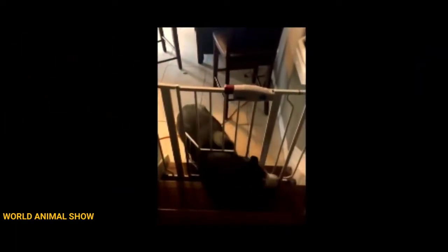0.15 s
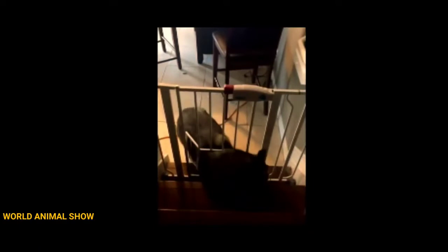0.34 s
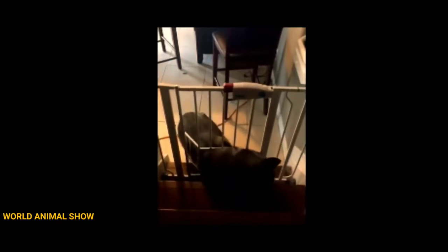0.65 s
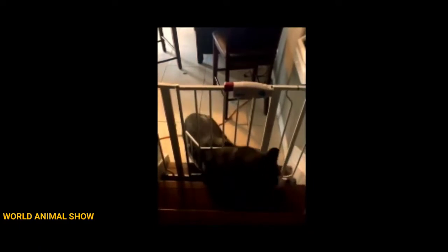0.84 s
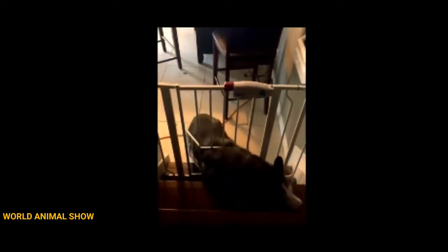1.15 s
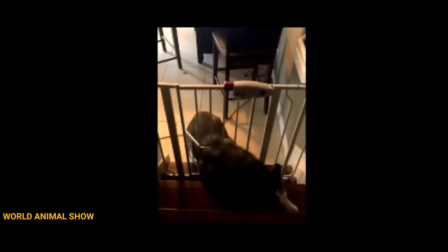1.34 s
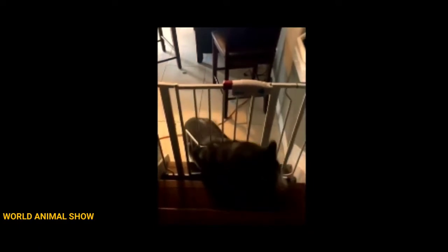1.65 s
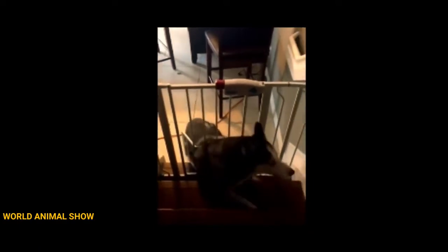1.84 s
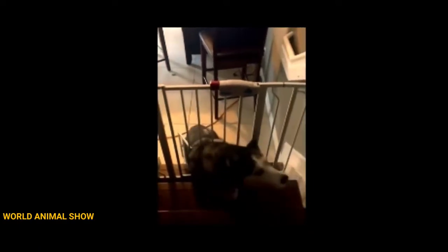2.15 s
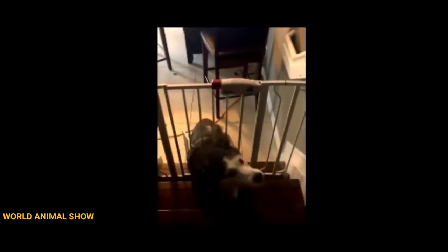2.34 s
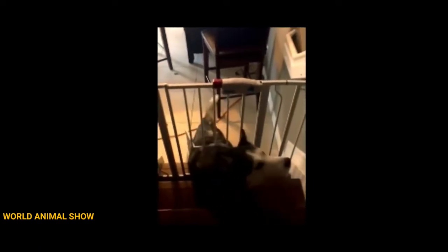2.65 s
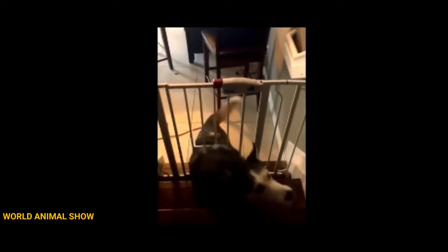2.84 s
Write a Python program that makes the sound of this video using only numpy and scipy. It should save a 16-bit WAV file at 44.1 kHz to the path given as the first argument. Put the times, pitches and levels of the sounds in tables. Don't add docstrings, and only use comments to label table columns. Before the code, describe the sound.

Irregular metallic clanks and dull wooden thumps as a dog squeezes past a barred indoor gate

```python
import sys
import numpy as np
from scipy import signal
from scipy.fft import rfft, irfft
from scipy.io import wavfile
from scipy.ndimage import uniform_filter1d

SR = 44100
rng = np.random.default_rng(int(sys.argv[2]) if len(sys.argv) > 2 else 0)


def waveform_to_disk(signal):
    frames = np.transpose(np.atleast_2d(signal))
    scaled = np.clip(frames, -1, 1) * 32767
    samples = np.round(scaled).astype(np.int16)
    wavfile.write(sys.argv[1], SR, samples)


def invert_db(x):
    u = np.asarray(x, float) / 20
    return 10 ** u


N = 132300
ATTACK_S = 0.001232

# (time [s], weight on the step [dB], fur and pads rubbing [dB])
EFFORT = [(0, -31, -48), (.045, -62, -58.5), (.15, -49.5, -45), (0.349, -51.5, -65), (0.601, -43, -45.5),
          (.9, -43.5, -49), (0.999, -28, -61), (1.22, -52, -43.5), (1.5, -50.5, -45.5), (1.75, -56.5, -37),
          (1.95, -45, -68), (2.05, -32.5, -77), (2.15, -41, -43), (2.52, -39.5, -37.5), (2.6, -33.5, -44),
          (2.74, -34, -69), (2.82, -46, -62), (3, -44.5, -61.5)]
# (pitch [Hz], level [dB], t60 [s])
STEP_MODES = [(64, -5.5, 0.11), (99.5, -1, 0.15), (153.9, -2.5, 0.29), (243.7, -4.5, 0.29),
              (298, -5.5, 0.31), (410, -6, 0.02), (499.3, 3, 0.17)]


def unit(x):
    return x / np.sqrt(np.mean(x ** 2))


def decay(t, t60):
    return np.exp(-np.log(1000) * t / t60)


def band(x, lo_hz, hi_hz):
    sos = signal.butter(2, [lo_hz, hi_hz], "band", fs=SR, output="sos")
    return signal.sosfilt(sos, x) * np.sqrt(SR / 2 / (hi_hz - lo_hz))


def highpass(x, hz, order):
    return signal.sosfilt(signal.butter(order, hz, "high", fs=SR, output="sos"), x)


def add(out, x, start_s):
    i = max(int(start_s * SR), 0)
    out[i:i + len(x)] += x[:N - i]


def ring(modes, scatter_db=0, detune=0.02):
    t = np.arange(SR // 3)[:, None] / SR
    hz, db, t60 = np.array(modes).T
    hz = hz * (1 + detune * rng.uniform(-1.04, 1, len(hz)))
    y = (invert_db(db + scatter_db) * np.sin(2 * np.pi * hz * t) * decay(t, t60)).sum(axis=1)
    return y / np.sqrt(np.sum(y ** 2))


def grit(size):
    return unit(rng.standard_normal(size) * invert_db(2.2 * rng.exponential(size=size)))


def patches(spread_db, size):
    return np.repeat(invert_db(spread_db * rng.standard_normal(size // 256 + 1)), 256)[:size]


def coloured(points, x):
    hz, db = np.array(points).T
    f = np.arange(N // 2 + 1) * SR / N + 1
    gain = invert_db(np.interp(np.log(f), np.log(hz), db)) * np.minimum(f / hz[0], 1) ** 2
    return unit(irfft(rfft(x) * gain, N))


def walk(rate_hz):
    k = int(SR / rate_hz)
    steps = np.repeat(rng.standard_normal(N // k + 1), k)
    return uniform_filter1d(uniform_filter1d(steps, k), k)[:N]


def contact(length_s):
    t = np.arange(SR // 4) / SR
    rise_s = ATTACK_S + 0.22 * length_s
    fall = np.exp(-t / max(length_s, 0.001)) + invert_db(-1.5) * np.exp(-t / rise_s)
    shape = np.minimum(t / rise_s, 1) ** 2 * fall
    bounces = np.where(t < 2 * rise_s, 1, patches(3, len(t)))
    x = grit(len(t)) * shape * bounces
    return x * np.sqrt(np.sum(shape ** 2) / np.sum(x ** 2))


def sing(table, loose):
    out, t = np.zeros(N), np.arange(SR // 4) / SR
    push = 1 - np.exp(-t / 0.0013)
    fade = np.cos(2 * np.pi * t)
    for start_s, db, hz, t60_s in table:
        buzz = 1 + loose * unit(uniform_filter1d(grit(len(t)), size=150))
        x = push * buzz * np.sin(2 * np.pi * hz * t) * decay(t, t60_s)
        add(out, invert_db(db) * x * fade, start_s - ATTACK_S)
    return out


def room_air():
    # (frequency [Hz], density [dB per Hz])
    air_spectrum = [(150, 4.5), (400, -38), (1500, -13), (6000, -18), (12000, -16), (16000, -39)]
    return invert_db(-60.5) * coloured(air_spectrum, rng.standard_normal(N))


def rubbing():
    # (frequency [Hz], density [dB per Hz])
    rub_spectrum = [(300, 8.5), (1000, -1), (2500, 3), (5000, -3), (11500, -18.5), (15500, -21)]
    time_s, _, rub_db = np.array(EFFORT).T
    shared = walk(25.64)
    edges_hz = 150 * 3.2 ** np.arange(5)
    grains = np.zeros(N)
    for lo, hi in zip(edges_hz[:-1], edges_hz[1:]):
        patchiness = invert_db(3.5 * (shared + walk(40.25)))
        grains += band(grit(N), lo, hi) * np.sqrt(hi - lo) * patchiness
    return coloured(rub_spectrum, grains) * invert_db(np.interp(np.arange(N) / SR, time_s, rub_db))


def creak():
    time_s, weight_db, _ = np.array(EFFORT).T
    push = rng.standard_normal(N) * invert_db(3 * walk(25.29))
    x = signal.fftconvolve(push, ring(STEP_MODES[:3]))[:N]
    return unit(x) * invert_db(np.interp(np.arange(N) / SR, time_s, weight_db))


def tags():
    # (time [s], level [dB], length [s], top mode boost [dB])
    thick_shakes = [
        (.0, -33.5, 0.0051, 14),
        (.133, -35, 0.0122, 7),
        (.413, -23, 0.014, -1),
        (1.875, -34, 0.068, 10),
        (1.951, -25, 0.012, 10.5),
    ]
    thin_shakes = [
        (.452, -36.5, 0.077, 14),
        (.575, -40.5, 0.078, 5),
        (.615, -36.5, 0.044, 8),
        (.645, -34, 0.033, -1),
        (.73, -37.5, 0.094, 24),
        (2.677, -48, 0.0023, 17),
        (2.712, -25.5, 0.0076, 7),
        (2.722, -39.5, 0.041, 0),
        (2.775, -53, 0.034, -2),
    ]
    # (pitch [Hz], level [dB], t60 [s])
    thick_modes = [(5300, 0, .014), (9450, -4, .011), (14050, -3, .007)]
    thin_modes = [(5530, -14, .015), (6750, -14, .015), (8390, 0, .024), (12000, 0, .013)]
    out, t = np.zeros(N), np.arange(SR // 6) / SR
    for shakes, modes in ((thin_shakes, thin_modes), (thick_shakes, thick_modes)):
        for start_s, db, length_s, top_db in shakes:
            shape = (t < length_s) * np.exp(-t / 0.074) * np.minimum(t / 0.00022, 1)
            x = grit(len(t)) * patches(3.5, len(t)) * shape
            x = x * np.sqrt(np.sum(shape ** 2) / np.sum(x ** 2))
            boost_db = top_db * (np.arange(len(modes)) == len(modes) - 1)
            add(out, invert_db(db) * signal.fftconvolve(x, ring(modes, boost_db, detune=0.005)), start_s)
    return out


def thumps():
    # (time [s], level [dB], pitch [Hz], clatter [dB])
    pushes = [(.004, -30, 250, -1.5), (0.118, -31.5, 245, 1.5), (.236, -8.5, 352, -10),
              (.266, -23.5, 413, -4.5), (.283, -39, 380, -7), (.327, -21.5, 281, -4),
              (.35, -25.5, 232, -15), (.385, -25.5, 635, 4), (0.543, -31, 150, -14), (0.584, -47, 178, -7),
              (.749, -14, 181, 1.5), (.893, -32, 220, -1), (0.916, -30, 214, 2), (.954, -21.5, 760, -6),
              (.967, -28.5, 106, 8), (0.984, -22, 199, -3), (1.012, -25.5, 155, -6),
              (1.242, -7, 257, -12.5), (1.292, -17, 290, -16), (1.566, -23.5, 278, -4.5),
              (1.572, -30.5, 100, -4), (1.71, -20, 370, -4), (1.977, -16.5, 335, -2.5),
              (2.056, -18.5, 226, 3.5), (2.081, -17, 155, -4.5), (2.149, -20, 149, -9),
              (2.217, -33.5, 145, 6), (2.349, -23, 420, -2), (2.393, -17.5, 149, 1.5),
              (2.5, -23, 218, -2.5), (2.555, -20.5, 132, -9), (2.649, -23.5, 158, 0), (2.611, -36, 92, -16),
              (2.83, -37, 149, -7), (2.877, -33, 146, -3.5)]
    lag_s = 0.00372
    out, t = np.zeros(N), np.arange(SR // 3) / SR
    for start_s, db, hz, loose_db in pushes:
        cycles = t * hz
        knock = np.sin(2 * np.pi * cycles) * np.minimum(cycles, 1) * decay(cycles, 4.69)
        knock = highpass(knock, hz / 2, order=2)
        scatter_db = 2 * rng.standard_normal(len(STEP_MODES))
        boards = signal.fftconvolve(knock, ring(STEP_MODES, scatter_db))
        clatter = band(contact(0.027), 260, 627)
        add(out, invert_db(db + 11) * knock, start_s + lag_s)
        add(out, invert_db(db - 13.5) * boards / np.abs(boards).max(), start_s + lag_s)
        add(out, invert_db(db - 10.5 + loose_db) * clatter, start_s)
    return out


def claws():
    # (time [s], body [dB], hiss [dB], length [s])
    strokes = [(0.0044, -20, -33, 0.0068), (0.139, -21, -36, 0.0048), (0.167, -17.5, -29, 0.022),
               (0.273, -50, -34, 0.011), (0.3313, -18.5, -34, 0.0075), (0.416, -17, -30.5, 0.02),
               (0.439, -4.5, -19, 0.0052), (0.6757, -16.5, -39, 0.025), (0.909, -22, -56, 0.046),
               (0.995, -50, -27.5, 0.011), (1.116, -56, -30.5, 0.0055), (1.19, -18.5, -56, 0.0049),
               (1.434, -16, -20, 0.0036), (1.5158, 0.5, -18, 0.0038), (1.525, -5, -34, 0.0043),
               (1.592, -30, -22, 0.01), (1.601, -10, -19.5, 0.0088), (1.804, -35, -20.5, 0.0036),
               (1.829, -48, -20.5, 0.0045), (2.2115, -16.5, -22, 0.014), (2.574, -41, -24, 0.0075),
               (2.725, -27, -35, 0.0042)]
    out = np.zeros(N)
    for start_s, body_db, hiss_db, length_s in strokes:
        x = contact(length_s)
        body = invert_db(body_db - 19.5) * band(x, 820, 4740)
        hiss = invert_db(hiss_db - 3) * band(x, 2300, 11900)
        add(out, body + hiss, start_s - ATTACK_S)
    return out


def singing_bars():
    # (time [s], peak level [dB], pitch [Hz], t60 [s])
    bar_notes = [(.075, -35, 2980, 0.042), (.172, -33, 1317, 0.036), (.24, -16, 713, 0.033),
                 (.538, -35, 2090, 0.34), (.538, -37, 1013, .06), (.726, -24, 1984, 0.1),
                 (0.753, -31, 949, 0.31), (.995, -24.5, 7800, 0.045), (1.248, -16.5, 1970, .1),
                 (1.248, -6, 2728, 0.04), (1.251, -27.5, 1011, 0.16), (1.249, -21, 1558, 0.12),
                 (1.271, -31.5, 3020, 0.18), (1.516, -21, 3160, 0.018), (1.526, -18, 4390, 0.022),
                 (1.565, -29, 1780, .03), (1.604, -18.5, 926, 0.034), (1.695, -15, 3420, 0.026),
                 (1.706, -27, 1440, 0.035), (1.733, -24, 2580, 0.034), (1.868, -33, 1550, 0.046),
                 (1.952, -39, 785, 0.077), (1.98, -20, 5200, 0.033), (1.988, -21, 3180, .03),
                 (2.013, -25.5, 5000, .02), (2.016, -18, 3130, 0.018), (2.03, -17.5, 4720, 0.048),
                 (2.031, -15.5, 2990, 0.027), (2.048, -24, 4610, .05), (2.351, -13.5, 425, 0.11),
                 (2.351, -17, 970, 0.073), (2.353, -20, 1420, .1), (2.353, -23.5, 1811, 0.16),
                 (2.352, -18, 2300, 0.052), (2.355, -21.5, 2735, 0.057), (2.449, -29, 1800, .08),
                 (2.66, -27, 2392, 0.095)]
    return sing(bar_notes, loose=0.6)


def paw_blows():
    # (time [s], clang [dB], crack [dB], rattle length [s])
    blows = [(0.535, -19.5, -25.5, 0.02), (0.722, -20, -27, 0.025), (0.744, -17, -29, 0.016),
             (0.958, -29.5, -45, 0.062), (1.099, -24, -55, 0.012), (1.2448, -5.5, -19.5, 0.015),
             (1.561, -13.5, -51, 0.01), (1.676, -18.5, -26, 0.0091), (1.693, -13.5, -17.5, 0.0082),
             (1.703, -17.5, -24.5, 0.013), (1.728, -24, -28, 0.0087), (1.866, -10, -26, 0.0055),
             (1.975, -15.5, -17.5, 0.0073), (1.99, -11, -15, 0.0059), (2.012, -14, -17.5, 0.01),
             (2.027, -19, -17, 0.0075), (2.045, -14, -26, 0.01), (2.148, -15.5, -40, 0.0053),
             (2.255, -19, -29.5, 0.011), (2.351, -9.5, -22, 0.013), (2.447, -19.5, -35.5, 0.028),
             (2.64, -26.5, -35.5, 0.015), (2.657, -18, -36, 0.025)]
    # (pitch [Hz], level [dB], t60 [s])
    bar_modes = [(408, 14, 0.092), (784, -24, 0.02), (971, 2.5, 0.42), (1200, 22, 0.043),
                 (1330, -22, 0.057), (1610, 19, 0.35), (1890, 18, 0.039), (2270, -40, 0.089),
                 (2353, -5, 0.027), (2390, 28, 0.051), (2720, -1, 0.035), (3170, 16.5, 0.034),
                 (3570, -1, 0.024), (4960, 12, 0.022)]
    out = np.zeros(N)
    for start_s, clang_db, crack_db, length_s in blows:
        x = contact(length_s)
        scatter_db = rng.standard_normal(len(bar_modes))
        clang = invert_db(clang_db - 7.5) * band(x, 280, 3620)
        crack = invert_db(crack_db - 0.5) * band(x, 1830, 10500)
        ringing = invert_db(clang_db - 25.5) * signal.fftconvolve(x, ring(bar_modes, scatter_db))
        add(out, clang + crack, start_s - ATTACK_S)
        add(out, ringing, start_s - ATTACK_S)
    return out


def humming_boards():
    # (time [s], peak level [dB], pitch [Hz], t60 [s])
    board_hums = [
        (.785, -28, 340, .15),
        (1.02, -30, 143, 0.24),
        (1.64, -38, 101, 0.25),
        (2.095, -23.5, 152.6, 0.64),
        (2.58, -31, 165.8, 0.35),
        (2.65, -26, 65, 0.41),
    ]
    return sing(board_hums, loose=0.2)


def room(x):
    # (band centre [Hz], t60 [s])
    room_decay = [(250, 0.31), (1000, 0.35), (4000, 0.27), (11000, 0.23)]
    t = np.arange(SR // 2) / SR
    tail = np.zeros(len(t))
    for hz, t60_s in room_decay:
        noise = band(rng.standard_normal(len(t)), hz / 2, min(hz * 2, 17000))
        tail += noise * np.sqrt(hz) * decay(t, t60_s)
    tail *= t > 0.00064
    return invert_db(-4.5) * signal.fftconvolve(x, tail / np.sqrt(np.sum(tail ** 2)))[:N]


def scene():
    near = paw_blows() + claws() + rubbing()
    sung = singing_bars()
    wood = thumps() + creak()
    jingle = tags()
    echo = room(near + invert_db(-8) * sung + invert_db(-3.5) * wood + invert_db(-9) * jingle)
    return (near + sung + wood + jingle + echo + room_air() + humming_boards())[None]


def roll_off(x):
    return signal.sosfilt(signal.butter(12, 16500, fs=SR, output="sos"), x)


def record(dry):
    x = np.tanh(highpass(dry, 51, order=4))
    top_cut = signal.ellip(8, 0.2, 45, 15600, fs=SR, output="sos")
    return roll_off(signal.sosfilt(top_cut, x))


dry = scene()
out = record(dry)
waveform_to_disk(out)
```